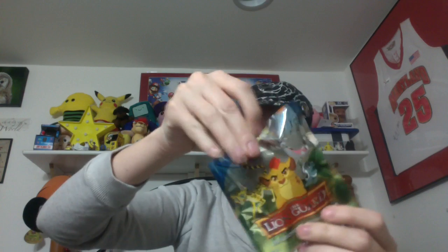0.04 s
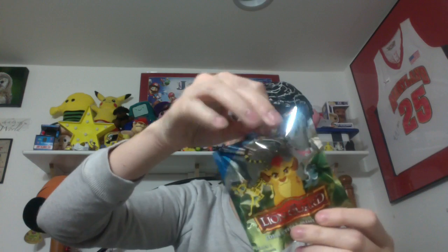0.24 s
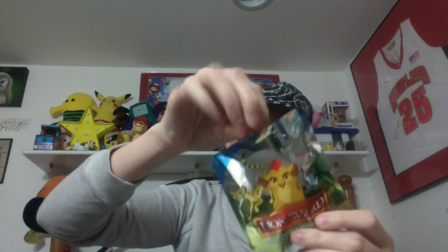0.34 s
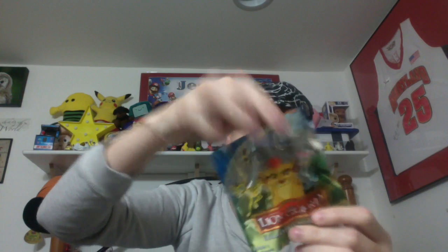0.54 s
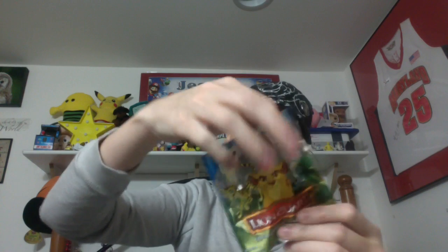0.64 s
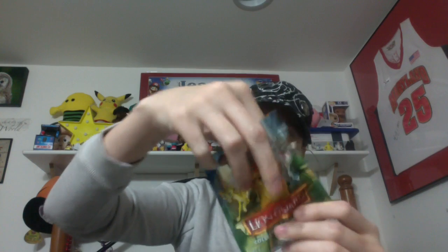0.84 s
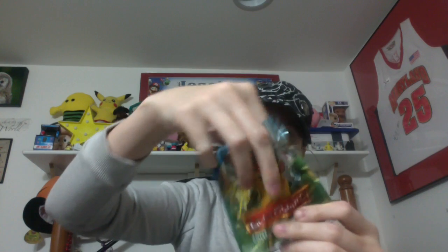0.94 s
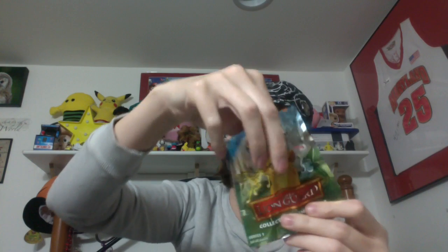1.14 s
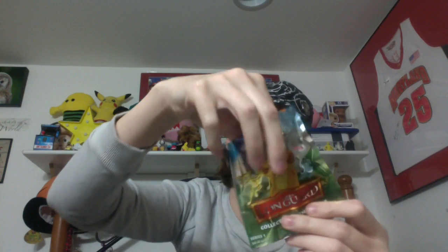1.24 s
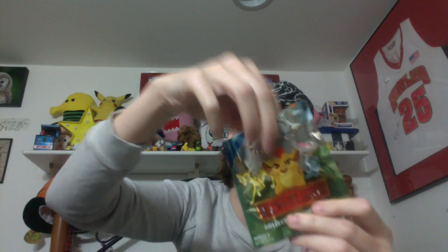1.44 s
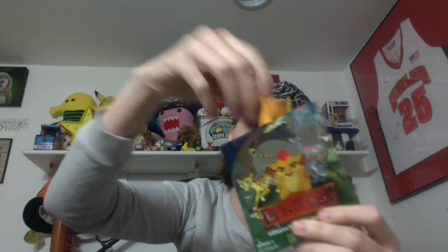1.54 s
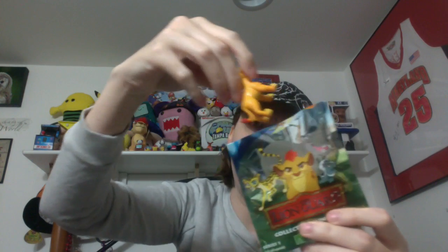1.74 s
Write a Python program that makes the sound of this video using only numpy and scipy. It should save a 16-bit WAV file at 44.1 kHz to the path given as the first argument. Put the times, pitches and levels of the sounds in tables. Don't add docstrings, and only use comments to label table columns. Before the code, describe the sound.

A foil packet crinkles sharply under fingers, snapping and crackling close up in a quiet room.

```python
import sys
import numpy as np
from scipy import signal
from scipy.fft import rfft, irfft
from scipy.io import wavfile
from scipy.ndimage import uniform_filter1d

SR = 44100
rng = np.random.default_rng(int(sys.argv[2]) if len(sys.argv) > 2 else 0)


def master(y):
    cut = np.clip(np.atleast_2d(y).T, -1, 1)
    pcm = np.round(cut * 32767)
    wavfile.write(sys.argv[1], SR, pcm.astype(np.int16))


def field_ratio(decibels):
    return 10 ** (np.asarray(decibels, dtype=float) / 20)


N = 79380

# (time [s], peak level [dB], pitch [Hz])
FACETS_EARLY = [(0.029, -18, 2000), (0.0807, -24.5, 1787), (0.0804, -19, 2832), (0.2257, -11, 1585),
                (0.2269, -4.5, 3716), (0.2265, -4, 2910), (0.2294, -2.5, 1640), (0.3749, -11, 3190),
                (0.375, -9, 2220), (0.3931, -14.5, 991), (0.4374, -17.5, 3890), (0.4383, -10.5, 2213),
                (0.4502, -10.5, 2563), (0.453, -14.5, 1340), (0.4623, -13.5, 1423), (0.517, -14, 2328),
                (0.5171, -20, 3660), (0.5176, -13.5, 1280), (0.5751, -8.5, 4460), (0.5766, 1, 1440),
                (0.5754, -1.5, 2535), (0.6196, -14.5, 1606), (0.6205, -12.5, 2450), (0.6373, -6, 3602),
                (0.6375, 0.5, 2226), (0.6544, -17.5, 3150), (0.6558, -8, 1990), (0.6914, -4, 2458),
                (0.6938, -14.5, 3070), (0.7552, -14.5, 3570), (0.755, -21, 1320), (0.7784, -21, 1370),
                (0.7776, -16, 3053), (0.7817, -25, 2300)]
FACETS_LATE = [(0.8124, -8, 2230), (0.8126, -14.5, 1140), (0.8184, -9.5, 1639), (0.838, -7.5, 1164),
               (0.8424, -11, 1714), (0.843, -10, 1120), (0.9116, -22, 2120), (0.9125, -19, 1160),
               (0.9467, -12, 4070), (0.9481, -8.5, 3110), (0.9484, -8, 1806), (0.9778, -16, 1177),
               (0.9779, -23.3, 2600), (0.9779, -20.5, 3760), (1.0495, -21, 2440), (1.0498, -11, 1720),
               (1.1054, -13, 3620), (1.1061, -12.5, 1893), (1.1675, -10.7, 3282), (1.1958, -24.5, 1913),
               (1.196, -19.5, 1024), (1.312, -18.5, 4040), (1.3124, -11.5, 1980), (1.32, -20, 1550),
               (1.3201, -18.5, 3845), (1.4466, -17.5, 1420), (1.4469, -14.5, 1950), (1.4478, -13.5, 2639),
               (1.4932, -24, 3286), (1.4942, -17, 2385), (1.521, -3.5, 2550), (1.5214, -11.5, 4270),
               (1.6086, -25.5, 2840), (1.6093, -24.5, 1230), (1.7279, -34, 3450), (1.728, -34.5, 851)]


def evened(x):
    return x / np.sqrt(np.mean(x ** 2) + 1e-20)


def read(points, hz):
    f, value = np.transpose(points)
    return np.interp(np.log(hz + 1), np.log(f + 1), value)


def colour(x, points):
    gain_db = read(points, np.fft.rfftfreq(len(x), 1 / SR))
    return irfft(rfft(x) * field_ratio(gain_db), len(x))


def band(x, hz, width_hz):
    f = np.fft.rfftfreq(len(x), 1 / SR)
    return evened(irfft(rfft(x) * np.exp(-.5 * ((f - hz) / width_hz) ** 2), len(x)))


def bell(t, rise_s, decay_s):
    return np.where(t < 0, np.exp(-(t / rise_s) ** 2), np.exp(-np.maximum(t, 0) / decay_s))


def add(mix, s, sound):
    part = mix[..., max(round(s * SR), 0):][..., :sound.shape[-1]]
    part += sound[..., :part.shape[-1]]


def room_hush():
    # (frequency [Hz], level [dB])
    hush = [(60, 25), (150, 16), (700, 10.5), (1500, -2), (4000, -12.5), (15000, -21)]
    return field_ratio(-59) * evened(colour(rng.standard_normal(N), hush))


def crackles(noise):
    rate_per_s, spread_db = 900, 4.2
    size = field_ratio(spread_db * np.minimum(rng.exponential(1, N), 4)) * (rng.random(N) < rate_per_s / SR)
    kind = rng.integers(0, 16, N)
    t, out = np.arange(200) / SR, np.zeros(N)
    for k, (log_hz, cycles) in enumerate(rng.uniform([6.7, 1.5], [8.9, 3.5], (16, 2))):
        hz = np.exp(log_hz)
        ring = np.sin(2 * np.pi * hz * t) * np.exp(-t * hz / cycles)
        out += signal.oaconvolve(size * (kind == k), ring)[:N]
    return evened(out)


def fingers():
    # (time [s], rustle level [dB], bright slide level [dB])
    rub = [(0, -41, -85), (.11, -50.5, -67), (0.161, -57, -80), (0.211, -41, -60.5), (.3, -51.5, -96),
           (.42, -37.5, -50), (0.548, -40.5, -59.5), (0.601, -28, -39.5), (0.724, -32.5, -48),
           (.74, -28, -34), (.83, -36.5, -51), (0.899, -39.5, -64), (1.02, -39, -58.5), (1.16, -42.5, -55),
           (1.259, -47, -77), (1.342, -41, -43.5), (1.47, -33, -49.5), (1.66, -59, -87)]
    # (frequency [Hz], level [dB])
    rustle_colour = [(47, -15.5), (80, -17), (259, 4), (1140, -6.5), (1460, 5), (3500, 2.5), (5200, -11.5),
                     (11500, -15), (16000, -77.5)]
    slide_hz, slide_width_hz = 11300, 6500
    s, rub_db, slide_db = np.transpose(rub)
    t = np.arange(N) / SR
    rub_db, slide_db = np.interp(t, s, rub_db), np.interp(t, s, slide_db)
    a, b, c, d = rng.standard_normal((4, N))

    rustle = evened(colour(a, rustle_colour)) * field_ratio(2.5 * evened(uniform_filter1d(c, 300)))
    crackle_db = 1 + 0.28 * (rub_db + 35)
    rubbing = field_ratio(rub_db - 8.0) * (rustle + field_ratio(crackle_db) * crackles(a))

    patch_db = 3 * evened(uniform_filter1d(np.array([c, d, a]), 1500))
    slide = np.zeros(N)
    for ratio, db in zip((.8, 1, 1.2), patch_db):
        slide += band(b, slide_hz * ratio, slide_width_hz / 4) * field_ratio(db)
    slide = evened(slide * field_ratio(5.2 * evened(uniform_filter1d(d, 120))))
    return rubbing + slide * field_ratio(slide_db)


def facets():
    rise_s, decay_s, room_db = .0004, .00095, -4
    out, t = np.zeros(N), (np.arange(512) - 128) / SR
    for s, db, hz in FACETS_EARLY + FACETS_LATE:
        ring = np.sin(2 * np.pi * hz * (t + s)) * bell(t, rise_s, decay_s)
        add(out, s - 128 / SR, field_ratio(db) * ring)
    return out * field_ratio([[0], [room_db]])


def snap(wave_db, hz, tick_db, length_ms, noise, shared_db):
    # (frequency [Hz], level [dB])
    tick_colour = [(3000, -8.5), (5300, -7.5), (8200, -3.5), (9500, -0.5), (13500, -7.5), (16000, -22.5)]
    glide, glide_share, decay_share, rough = 1.1274, 0.9, 0.6, 0.62
    rise_s, lead_s, lead_db = .00045, 0.005, -39
    size = len(noise[0])
    t, f = (np.arange(size) - 128) / SR, np.fft.rfftfreq(size, 1 / SR)
    length_s = length_ms / 1000

    fall = np.exp(-np.maximum(t + rise_s, 0) / (glide_share * length_s))
    pitch_hz = hz * (1 - 0.4263 * glide + glide * fall)
    clean = np.sin(2 * np.pi * np.cumsum(pitch_hz) / SR + 3 * noise[0, 0])
    wave = (1 - rough) * clean + rough * band(noise[0], hz, 0.69 * hz)
    shape = bell(t, rise_s, decay_share * length_s) + field_ratio(lead_db) * bell(t, lead_s, rise_s)
    wave = field_ratio(wave_db) * evened(wave * shape) * np.sqrt(np.mean(shape ** 2))
    wave = signal.lfilter(*signal.butter(2, 410, "high", fs=SR), wave)

    hardness = [(11000, 0.003), (13000, 0.52 * (tick_db + 16.5))]
    tick = colour(colour(noise[1], tick_colour), hardness) * bell(t, .0003, .4 * length_s)
    tick = evened(tick) * field_ratio(tick_db - 15.0)

    wave_band = evened(np.exp(-.5 * (np.log2((f + 1) / hz) / 0.87) ** 2))
    tick_band = evened(field_ratio(read(tick_colour, f)) * (f > 2500))
    twin = field_ratio(shared_db / 2) * np.linalg.norm(wave) * wave_band + np.linalg.norm(tick) * tick_band
    return np.array([field_ratio(shared_db) * wave + tick, np.roll(irfft(twin), 128)])


def creases():
    # (time [s], wave peak level [dB], pitch [Hz], tick peak level [dB], length [ms])
    snaps = [(0.0294, -19, 2245, -54, 4.6), (0.0809, -11, 2343, -37.5, 1.18), (0.119, -39, 1680, -65, 1.9),
             (0.2243, -5, 858, -7.5, 3.6), (0.2267, -2, 2130, -5.5, 3.5), (0.2845, -24.5, 770, -54, 0.39),
             (0.3206, -36, 836, -56, 1.6), (0.341, -23, 1860, -60, 0.28), (0.3469, -26.5, 2200, -35.5, 0.86),
             (0.3554, -18.5, 2615, -33, 0.84), (0.3752, -8.5, 2587, -8.5, 1.8),
             (0.3935, -7.5, 1570, -30.5, 0.58), (0.4046, -23.5, 1580, -34, 2.3),
             (0.432, -27.5, 2120, -28, 6.4), (0.4376, -13, 2290, -14, 4), (0.4506, -8.5, 1682, -20.5, 2.8),
             (0.4626, -9.5, 1600, -38, 1.8), (0.4654, -20.5, 2355, -34.5, 1.8),
             (0.4964, -26.5, 1720, -49, 2.1), (0.5172, -22.5, 1670, -24.5, 1.6),
             (0.531, -23.5, 1890, -23, 2.5),
             (.2288, -14, 1000, -23, 3.6),
             (0.5666, -18.5, 2200, -61, 0.3), (0.5757, 1.5, 1840, -4, 2.5), (0.6046, -29.5, 2260, -47, 1.5),
            (0.6198, -17.5, 1970, -46, 0.69), (0.6376, -6, 2370, -3, 1.5), (0.6544, 0.5, 2143, -13, 0.96),
            (0.6623, -14.5, 2360, -24, 2.8), (0.6932, -1, 1967, -15.5, 1.27),
            (0.735, -29, 1620, -22.5, 2.6), (0.7458, -16, 2570, -30, 0.67), (0.7562, -6, 1770, -19, 0.37),
            (0.778, -7.5, 2380, -18, 0.21), (0.805, -12, 2270, -23, 0.91), (0.813, -1, 2123, -20, 0.78),
            (0.8188, -5.5, 1760, -20, 0.81), (0.8374, -12, 1130, -31, 3.1), (0.8422, -3, 1700, -11.5, 2.1),
            (0.912, -15, 1620, -36, 1.7), (0.9245, -19.5, 1630, -52, 0.6), (0.948, -3.5, 2155, -12, 0.7),
            (0.9776, -16.5, 1950, -17.5, 1.8),
             (1.0498, -12, 1860, -18.5, 1.5), (1.1044, -8.5, 1576, -21, 4), (1.1221, -16, 1756, -20, 5.6),
             (1.168, -10, 3330, -29, 0.7), (1.1706, -19.5, 1730, -46, 2.1), (1.1958, -16.5, 1480, -62, 2.9),
             (1.2355, -35, 770, -66, 3.1), (1.3121, -12, 2186, -27.5, 1.2),
             (1.3205, -10, 1790, -19.5, 0.72), (1.3867, -32.5, 2120, -37.5, 0.8),
             (1.4099, -25, 1036, -54, 0.49), (1.4362, -19, 2776, -35, 6.4), (1.4473, -7, 1873, -23.5, 3.6),
             (1.468, -32, 1640, -48, 2.3), (1.4879, -17, 1910, -40, 1.05), (1.4934, -21, 1810, -15.5, 2.6),
             (1.5116, -21.5, 924, -34, 1.46), (1.5195, -16.5, 2590, -36, 1.6),
             (1.5215, -2, 2277, -11.5, 0.4), (1.595, -57, 2870, -27, 3), (1.6082, -19.5, 1820, -47, 1.14),
             (1.655, -49.5, 1620, -53, 3.4), (1.728, -28.5, 1690, -57.5, 0.45)]
    rows, out = snaps, np.zeros((2, N))
    ring_s = np.array(FACETS_EARLY + FACETS_LATE)[:, 0]
    for (s, *row), noise in zip(rows, rng.standard_normal((len(rows), 2, 1024))):
        shared_db = -6.5 * (abs(ring_s - s).min() < .0019)
        add(out, s - 128 / SR, snap(*row, noise, shared_db))
    return out


def puffs():
    # (time [s], peak level [dB], pitch [Hz])
    pumps = [(0.033, -30.5, 457), (0.085, -30.5, 260), (0.229, -14, 300), (0.239, -31, 338),
             (0.393, -12.5, 371), (0.45, -21.5, 477), (0.574, -18.5, 374), (0.656, -19.5, 372),
             (0.723, -24, 252), (0.814, -22.5, 450), (1.11, -16.5, 336), (1.123, -10, 292),
             (1.278, -37, 400), (1.317, -22, 430), (1.387, -27.5, 270), (1.447, -12, 384),
             (1.497, -18, 335), (1.522, -19, 410)]
    rise_s, rough = .0024, .3
    out, t = np.zeros((2, N)), (np.arange(2048) - 512) / SR
    for (s, db, hz), noise in zip(pumps, rng.standard_normal((len(pumps), 2048))):
        push = np.sin(2 * np.pi * hz * t + 3 * noise[0])
        push = (1 - rough) * push + rough * band(noise, hz, 220)
        push = band(push * bell(t, rise_s, 0.47 * rise_s), hz, 0.84 * hz)
        add(out, s - 512 / SR, field_ratio([[db - 21], [db - 29.5]]) * push)
    return out


def room(x):
    # (frequency [Hz], t60 [s])
    t60 = [(150, 0.18), (1200, 0.084), (4590, 0.15), (12100, 0.15)]
    # (frequency [Hz], level [dB])
    room_colour = [(300, 11), (2000, -1.5), (5500, -2.5), (12000, -6)]
    tail_db, shiver_db, echo_db = -13, -12, -20
    echo_s, shiver_s = 0.008, .007
    out, turn = np.zeros(N), np.arange(N) / SR * 23
    t = np.arange(SR // 3) / SR
    for k in range(3):
        a, b = rng.standard_normal((2, len(t)))
        hz, ts, z = signal.stft(a, SR, nperseg=128)
        decay = field_ratio(-60 * ts / read(t60, hz)[:, None])
        tail = signal.istft(z * decay, SR, nperseg=128)[1][:len(t)]
        tail *= np.clip(t / echo_s, 0, 1)
        shiver = b * abs(uniform_filter1d(a, 20)) * np.exp(-t / shiver_s) * np.clip(t / .002, 0, 1)
        echo = b * np.exp(-((t - echo_s) / .0016) ** 2)
        parts = [(tail_db, tail), (shiver_db, shiver), (echo_db, echo)]
        response = sum(field_ratio(db) * v / np.linalg.norm(v) for db, v in parts)
        feed = x * np.sqrt(2 / 3) * np.cos(np.pi * (turn + k / 3))
        out += signal.fftconvolve(feed, response)[:N]
    return colour(out, room_colour)


def scene():
    foil, feed = facets() + creases() + puffs()
    return (foil + room(feed) + fingers() + room_hush())[None]


def top_cut(x):
    return signal.sosfilt(signal.butter(12, 16570, fs=SR, output="sos"), x)


def record(dry):
    bass_cut = signal.butter(4, 115, "high", fs=SR, output="sos")
    thin = signal.sosfilt(bass_cut, np.clip(dry, -1.1, 1.1))
    thin = signal.oaconvolve(thin, signal.firwin(255, 15950, fs=SR)[None], "same")
    mix = np.clip(thin, -1, 1)
    return top_cut(mix)


dry = scene()
out = record(dry)
master(out)
```